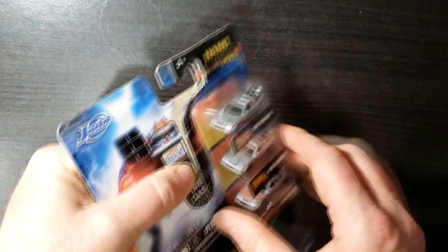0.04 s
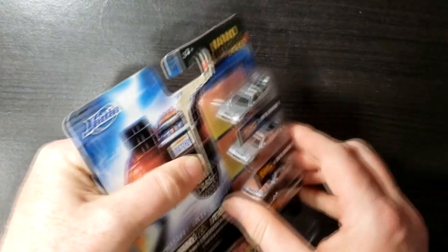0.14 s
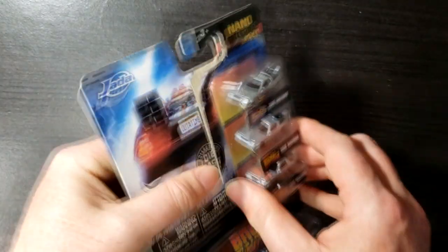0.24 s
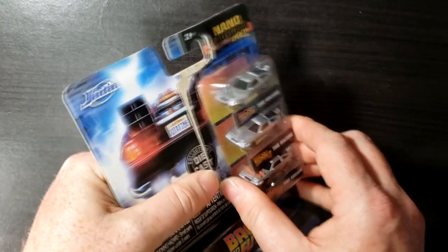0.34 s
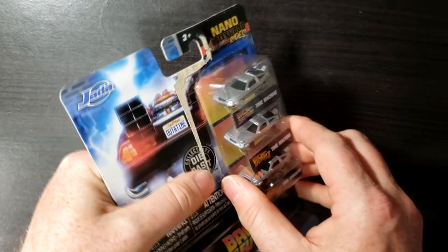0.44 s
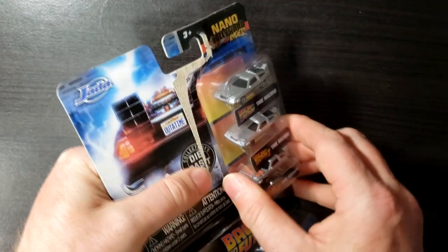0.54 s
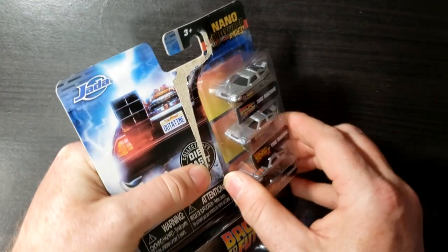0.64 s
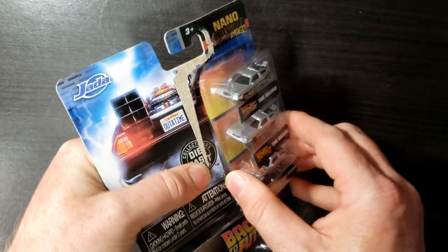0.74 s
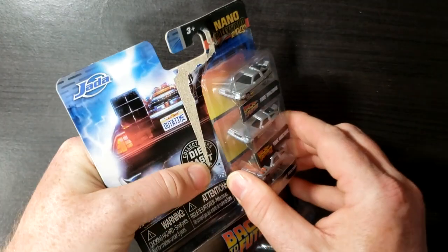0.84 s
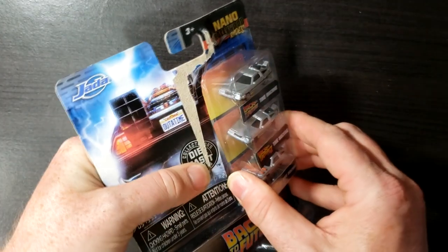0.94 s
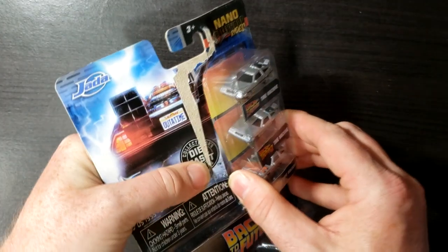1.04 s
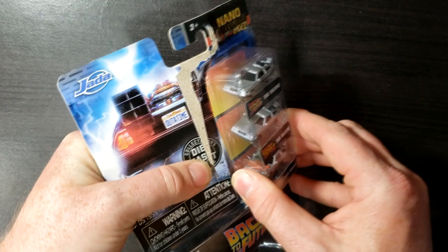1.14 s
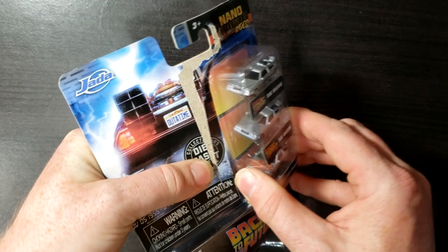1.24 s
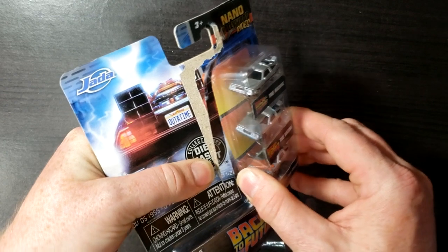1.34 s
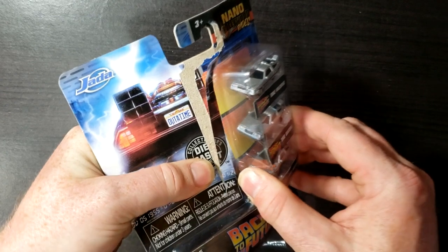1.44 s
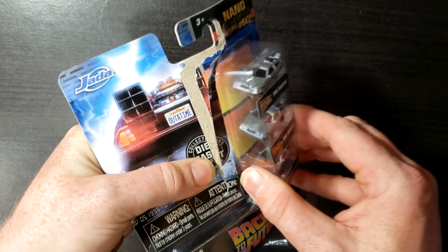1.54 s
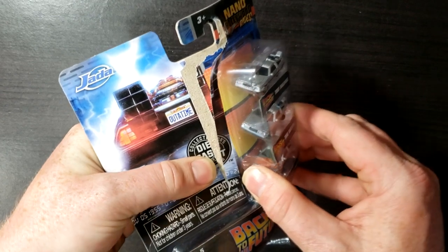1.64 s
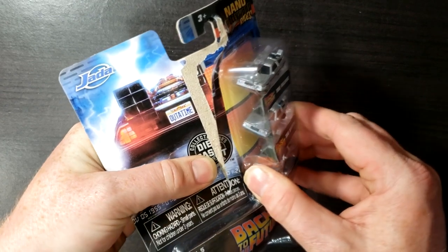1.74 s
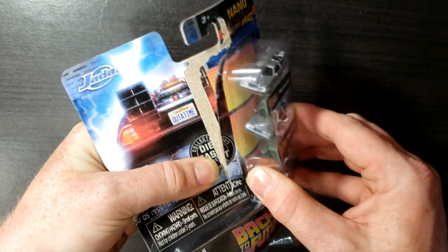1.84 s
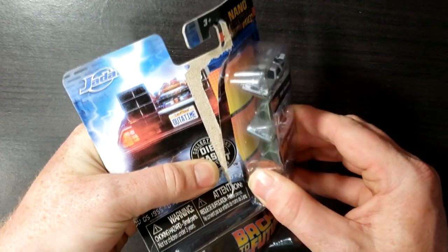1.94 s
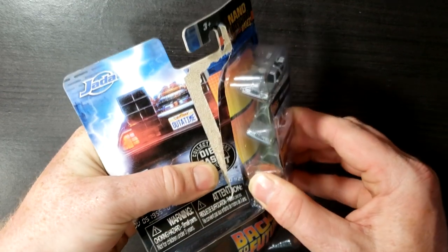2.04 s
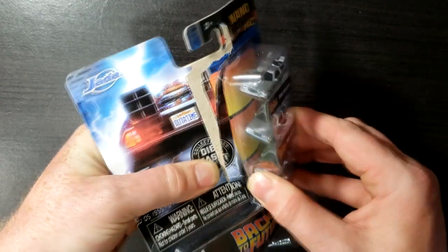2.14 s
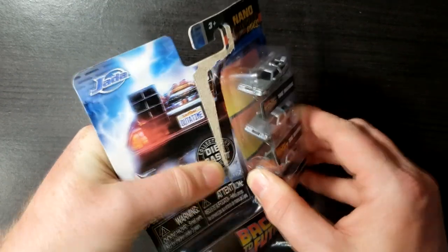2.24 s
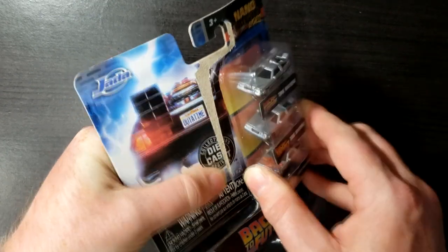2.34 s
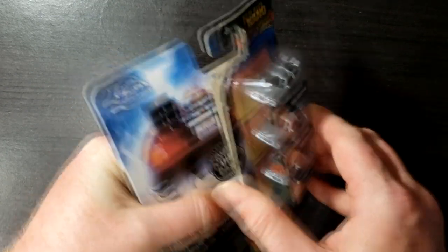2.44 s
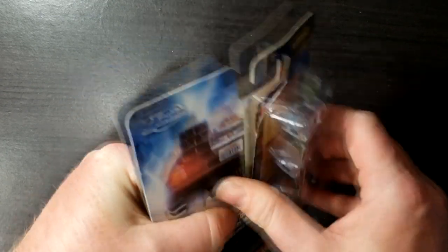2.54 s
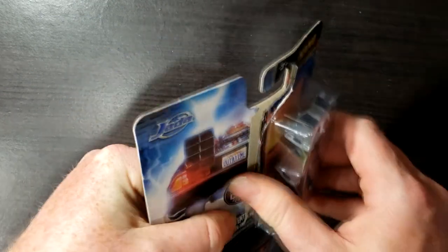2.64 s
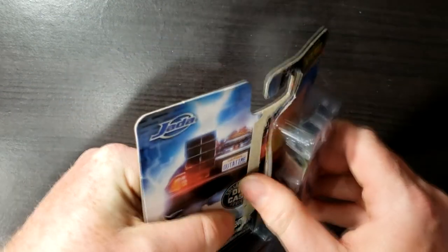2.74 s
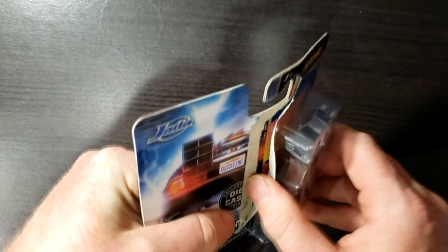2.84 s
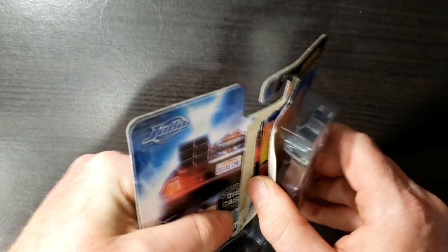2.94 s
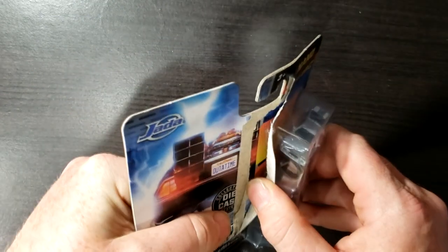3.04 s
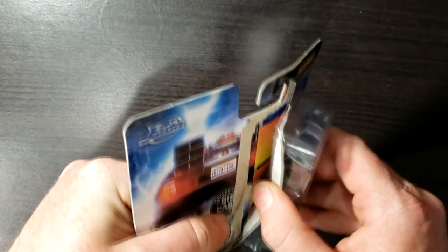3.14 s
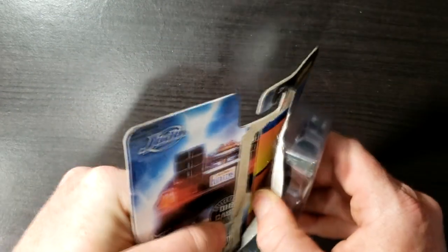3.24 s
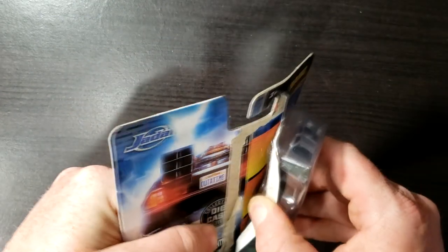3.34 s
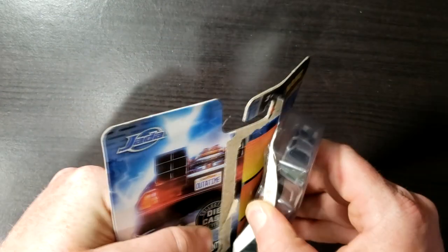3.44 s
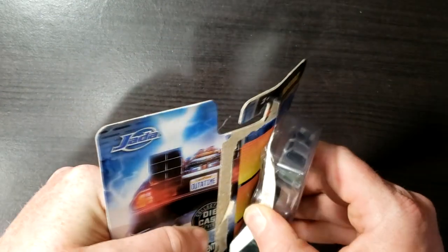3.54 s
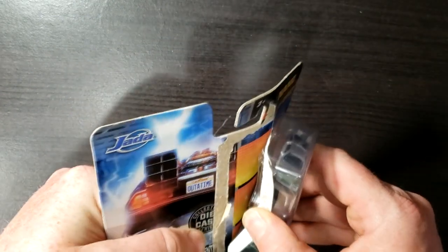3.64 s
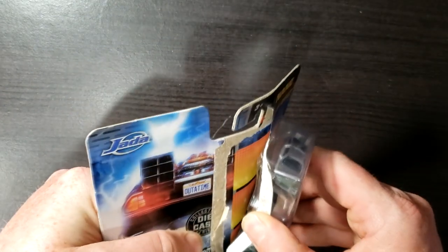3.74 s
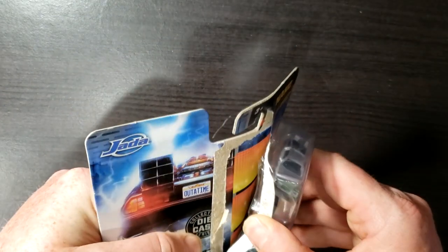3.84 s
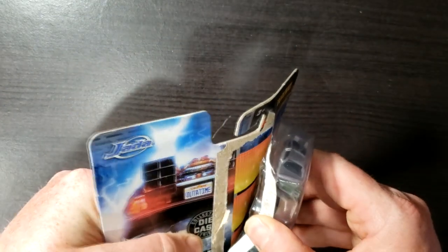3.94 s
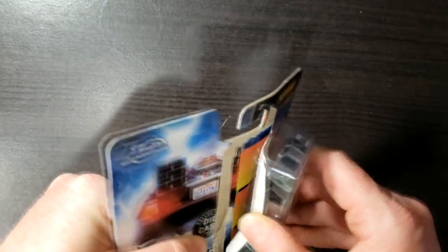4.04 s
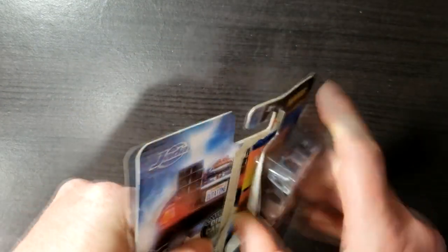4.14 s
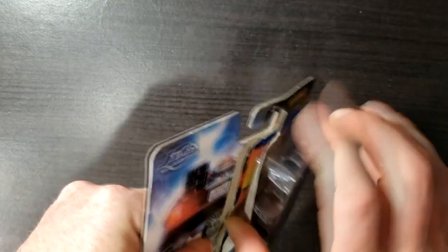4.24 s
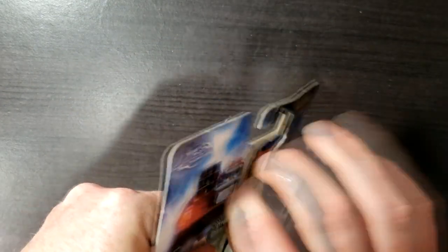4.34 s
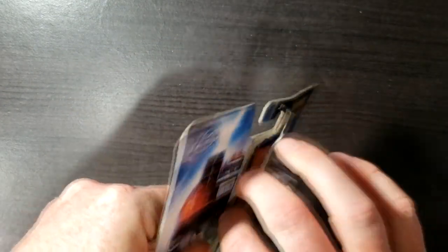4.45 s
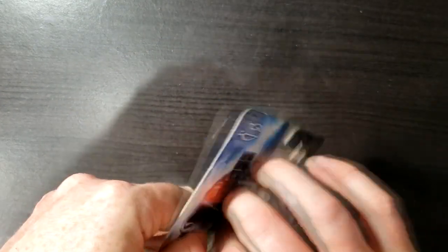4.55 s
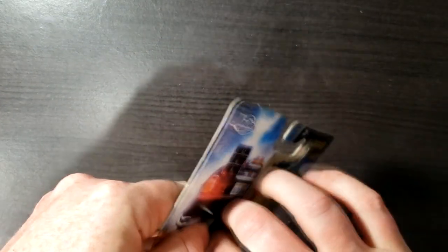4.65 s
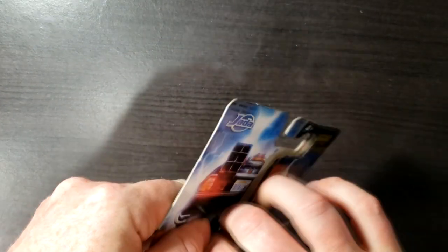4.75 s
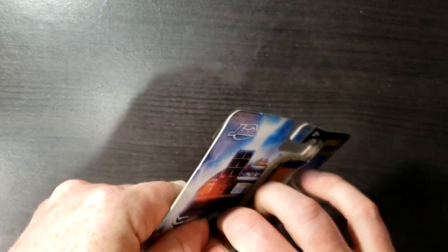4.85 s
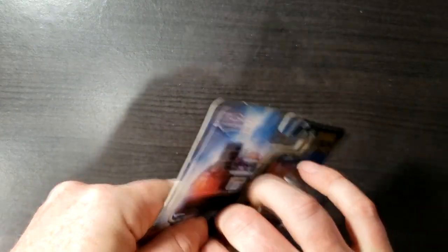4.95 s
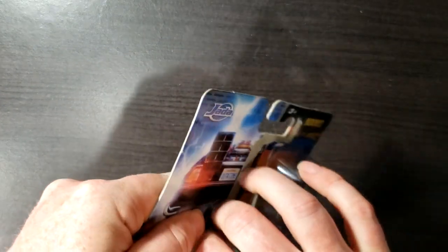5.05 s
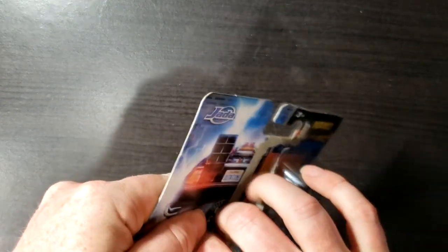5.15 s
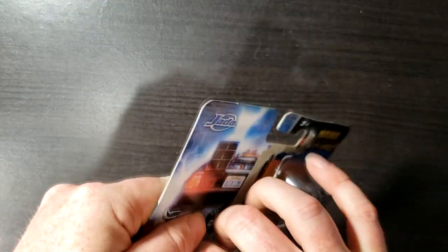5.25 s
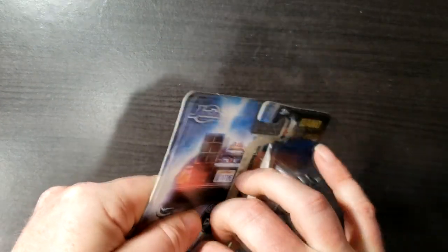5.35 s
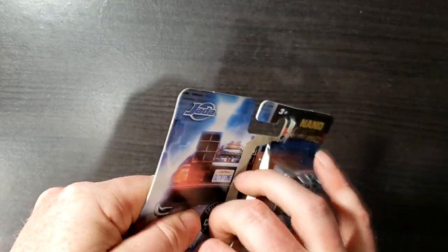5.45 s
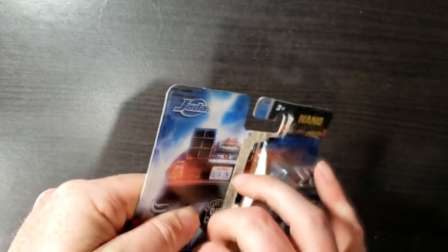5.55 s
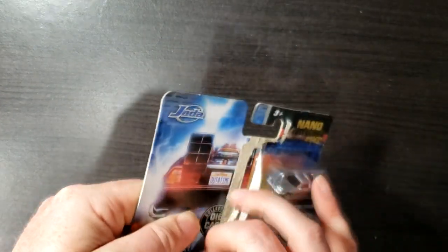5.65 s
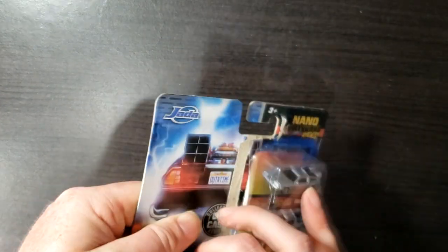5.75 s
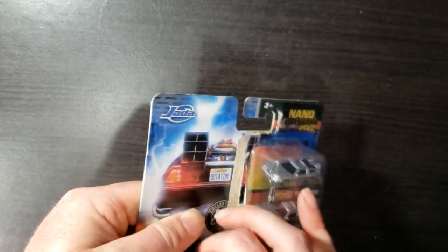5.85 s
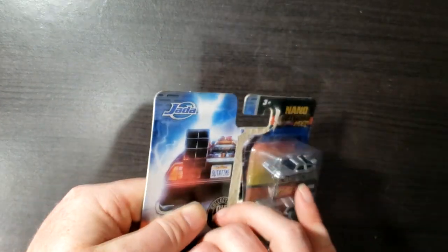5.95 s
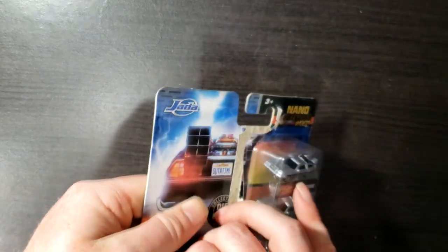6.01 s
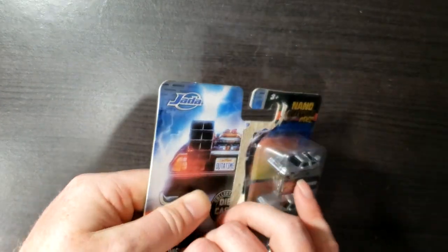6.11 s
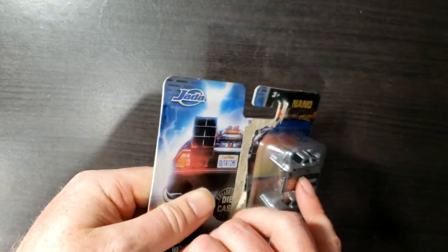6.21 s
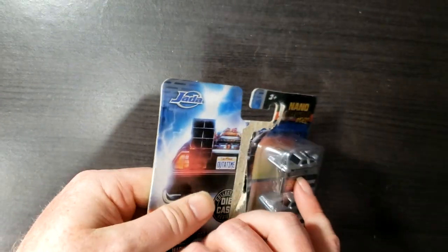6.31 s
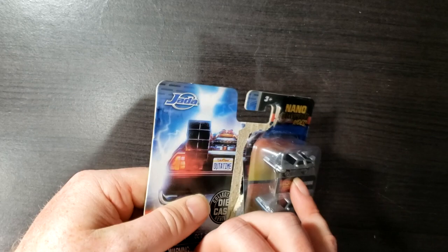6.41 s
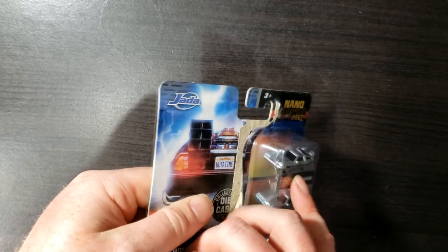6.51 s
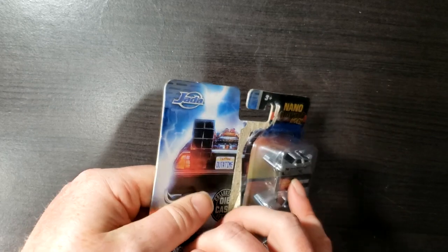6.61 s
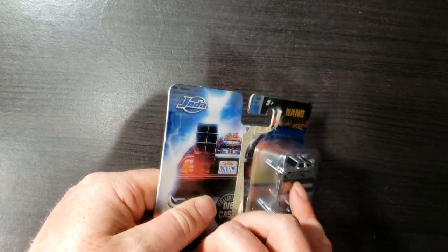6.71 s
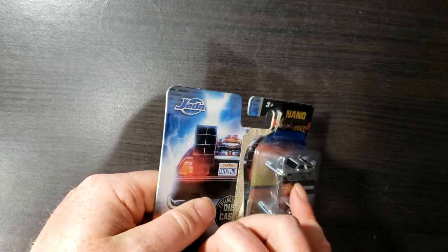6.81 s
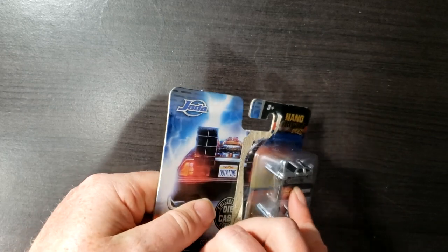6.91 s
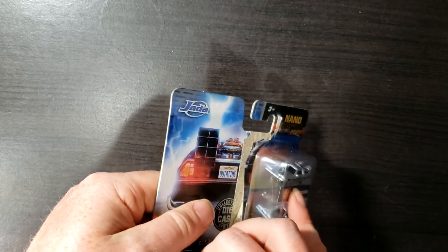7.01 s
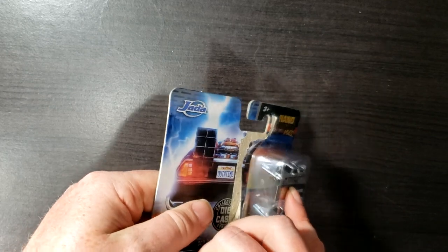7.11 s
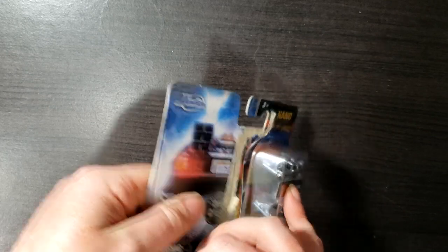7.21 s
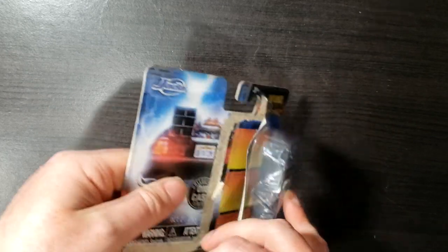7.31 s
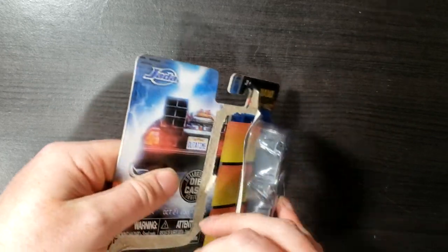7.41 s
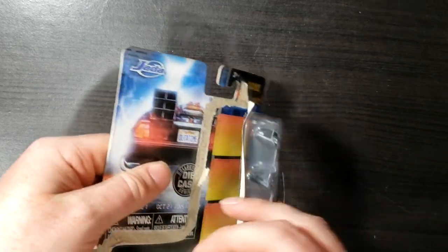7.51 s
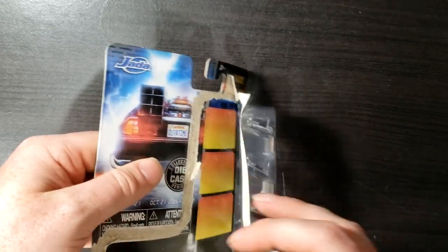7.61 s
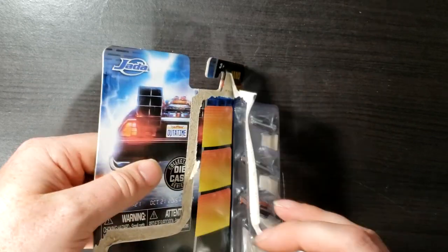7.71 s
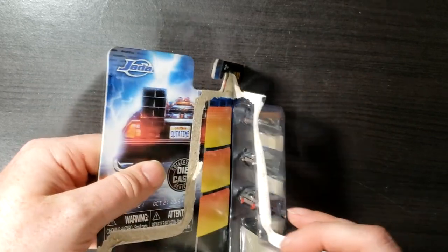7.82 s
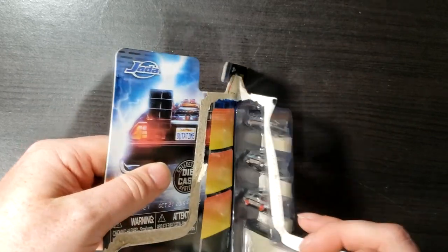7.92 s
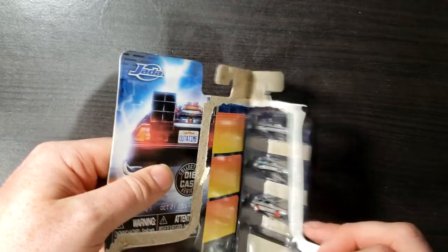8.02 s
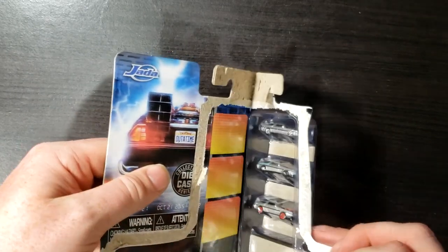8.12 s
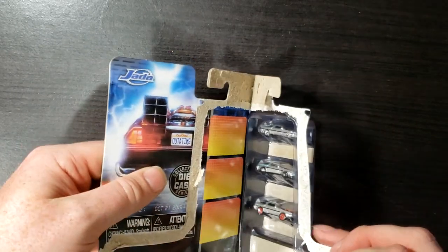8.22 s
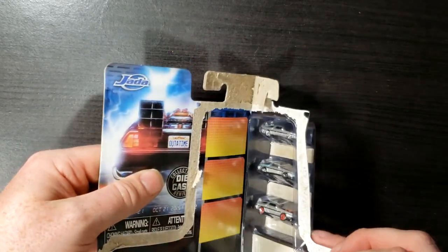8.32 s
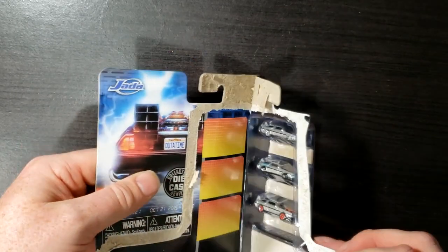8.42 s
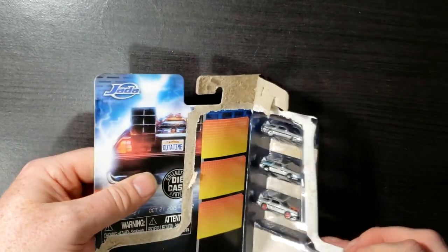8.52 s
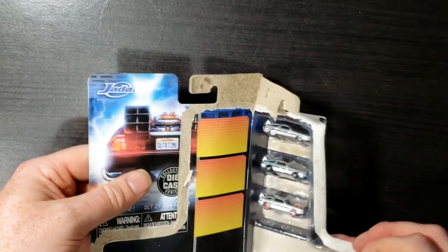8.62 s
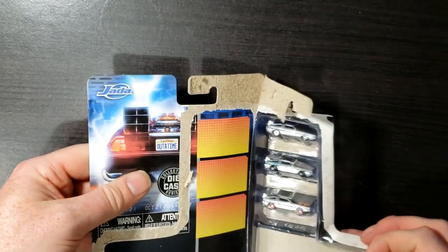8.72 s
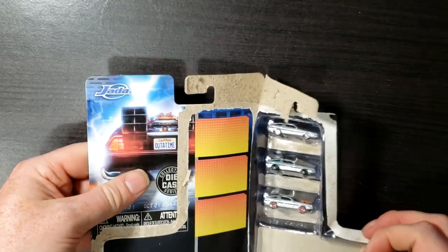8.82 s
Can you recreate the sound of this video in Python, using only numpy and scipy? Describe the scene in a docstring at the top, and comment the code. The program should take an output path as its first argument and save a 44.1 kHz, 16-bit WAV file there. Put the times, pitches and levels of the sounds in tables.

```python
"""A faint mains hum and low room air lie underneath, stronger on the right.
Close to a pair of microphones in a small room, two hands tear a plastic blister off its card backing.
Fibres crackle and plastic slides, as bursts of noise and steady noise that follow the pull of the hands.
The glue lets go in snaps: short noise cracks that ring modes of card and plastic. Dull low knocks join in.
Late in the tear, short resonant squeaks come from plastic slipping on card."""
import sys
import numpy as np
from scipy import signal
from scipy.fft import rfft, irfft, next_fast_len
from scipy.io import wavfile
from scipy.ndimage import uniform_filter1d

SR = 44100
rng = np.random.default_rng(int(sys.argv[2]) if len(sys.argv) > 2 else 0)


def put_to_file(sound):
    """Save the sound as 16-bit audio at rate SR, in the file named by the first command-line argument."""
    columns = np.atleast_2d(sound).T  # one column per channel
    safe = np.clip(columns, -1, 1)
    whole_steps = np.round(safe * 32767)
    wavfile.write(sys.argv[1], SR, whole_steps.astype(np.int16))


N = 391166

# How the plastic comes away. Each row: time in seconds, grit (0 smooth sliding, 1 separate fibres breaking).
GRITTINESS = [(0, 0.37), (.7, 0.49), (1, 0.57), (2.3, 0.89), (3, 0.86), (3.6, 0.69), (4.2, 0.93),
              (4.5, 0.26), (5, 0.79), (5.7, 0.8), (6.1, 0.5), (6.4, 1), (7, 0.35), (7.5, 0.52),
              (7.8, 0.038), (8, 0.76), (8.6, 0.39)]
CARD_HZ = 1250  # centre of the card's modes at its usual bend


def amp(db):
    """Decibels to gain."""
    return 10 ** (np.asarray(db) / 20)


def unit(x):
    """Scales to rms 1."""
    return x / np.sqrt(np.mean(x ** 2) + 1e-20)


def read(points, hz):
    """Reads a spectrum on a log-frequency axis."""
    f, value = np.transpose(points)
    return np.interp(np.log(hz + 1), np.log(f), value)


def add(mix, s, sound):
    """Adds a stereo sound at time s."""
    part = mix[:, max(round(s * SR), 0):][:, :sound.shape[1]]
    part += sound[:, :part.shape[1]]


def colour(x, spectrum, size=2048):
    """Causal minimum-phase filter with the given spectrum, so attacks stay sharp."""
    hz = abs(np.fft.fftfreq(size, 1 / SR))
    log_gain = np.log(amp(read(spectrum, hz)))
    minimum_phase = np.exp(np.conj(signal.hilbert(log_gain)))
    taps = np.fft.ifft(minimum_phase).real[:size // 2]
    return signal.fftconvolve(x, taps[None], axes=1)[:, :x.shape[1]]


def background(hum_hz=120, hum_db=(-66, -53.5), air_db=(-64.5, -60.5), apart=0.13):
    """Mains hum is one steady tone, room air is low noise; levels are for left and right."""
    # Spectrum of the air. Each row: frequency in Hz, relative level in dB per Hz.
    air_spectrum = [(15, -31.5), (33, -32.5), (41, 11.5), (62, 4), (85, 2), (130, 1.5), (200, -5),
                    (300, -4), (450, -21), (900, -16), (2000, -45.5), (5000, -42.5), (15000, -29.5)]
    hum = np.sqrt(2) * np.sin(2 * np.pi * hum_hz * np.arange(N) / SR)
    shared = rng.standard_normal(N)
    noise = shared + apart * rng.standard_normal((2, N))
    air = unit(colour(noise, air_spectrum, size=16384))
    return amp(hum_db)[:, None] * hum + amp(air_db)[:, None] * air


def pull(arch=0.58, peak_share=0.48):
    """Strength of flexing and of fizz over time: the steady strain plus tugs that swell and ease.

    arch sets how full a tug's swell is (smaller is fuller), peak_share where in its length it is strongest.
    """
    # Steady strain of the hands. Each row: time in seconds, card flexing and fibre fizz in relative dB.
    strain = [(0, -70, -80), (.49, -72.5, -71), (.78, -58.5, -50), (1.5, -48, -41.5), (2.33, -52, -44),
              (2.47, -62, -64), (2.95, -57, -54.5), (3.2, -46.5, -39), (3.96, -65, -47.5),
              (4.38, -73.5, -72), (4.5, -55.5, -50.5), (5.35, -61.5, -68), (5.7, -53, -50),
              (6.2, -63.5, -55.5), (7.2, -54, -52), (7.48, -68, -69.5), (7.659, -67, -55),
              (8.121, -66, -41.5), (8.3, -63.5, -58.5), (8.87, -59, -39)]
    # Single tugs, each peeling a little more. Each row: start in seconds, length in seconds,
    # card flexing and fibre fizz in relative dB.
    tugs = [(0.179, 0.1, -58, -60.5), (0.266, 0.17, -69, -57), (0.521, 0.18, -53, -47),
            (0.71, 0.18, -65, -42), (0.984, 0.084, -46.5, -36), (1.223, 0.12, -43, -42),
            (1.529, 0.089, -41, -34.5), (1.656, .08, -52, -35.5), (2.17, 0.14, -48, -35),
            (2.24, 0.18, -42, -53), (2.516, 0.13, -52, -57), (2.679, 0.094, -45.5, -39.5),
            (2.806, 0.069, -53, -39), (3.004, 0.13, -66, -41.5), (3.165, .13, -40.5, -38.5),
            (3.344, 0.095, -42, -38), (3.443, 0.21, -49.5, -34), (3.822, 0.095, -53, -38),
            (4.012, .1, -41.5, -37), (4.119, 0.14, -49, -47), (4.425, 0.12, -52.5, -49),
            (4.646, .1, -60, -51), (4.755, .12, -51.5, -44.5), (4.988, 0.093, -43.5, -41),
            (5.091, 0.1, -45, -40), (5.217, 0.082, -45.5, -41.5), (5.377, 0.055, -45.5, -39),
            (5.53, 0.23, -43.5, -37.5), (5.754, 0.078, -45, -33), (5.893, 0.25, -46, -38.5),
            (6.071, 0.092, -47, -35), (6.217, 0.11, -44.5, -50), (6.332, 0.075, -46, -41),
            (6.443, .1, -45.5, -50), (6.556, 0.068, -54, -45.5), (6.868, .2, -52.5, -38),
            (7.913, 0.17, -46.5, -32.5), (8.382, 0.084, -60, -45), (8.627, 0.088, -49, -36)]
    t = np.arange(N) / SR
    s, *levels = np.transpose(strain)
    power = amp([np.interp(t, s, level) for level in levels]) ** 2
    for start, length, *db in tugs:
        near = slice(round(start * SR), round((start + length) * SR))
        progress = (t[near] - start) / length
        phase = np.interp(progress, [0, peak_share, 1], [0, np.pi / 2, np.pi])
        swell = abs(np.sin(phase)) ** arch
        power[:, near] += (amp(db)[:, None] * swell) ** 2
    return np.sqrt(power)


def fibres(per_s=170, spread_db=7.0, largest=1.2, flex_decay_s=0.0027, fizz_decay_s=.001, apart_db=2.5):
    """Fibres load and break one after another, each with a short tick and a longer shiver of the card."""
    times = np.cumsum(rng.gamma(2, .5, 6000)) / per_s
    t = np.arange(SR // 80) / SR
    out = np.zeros((2, 2, N))  # shivers and ticks, each in stereo
    for s in times[times < N / SR]:
        size, length, *apart = np.clip(rng.standard_normal(4), -largest, largest)
        for layer, usual_decay, own in zip(out, (flex_decay_s, fizz_decay_s), apart):
            decay = usual_decay * np.exp(0.9 * length)
            burst = rng.standard_normal((2, len(t))) * np.exp(-t / decay)
            add(layer, s, amp(spread_db * size + apart_db * own) * burst)
    # the pull sets how much breaks in each moment, however the breaks are shared out
    local_power = uniform_filter1d((out ** 2).mean(1, keepdims=True), size=3000)
    return out / np.sqrt(local_power + 1e-4)


def tearing(flex_db=-3.5, fizz_db=-5.5, slide_db=3.0):
    """Breaking fibres and smooth sliding follow the pull, and flare where the tear runs."""
    # Fast runs of the tear. Each row: peak in seconds, rise and fall of the power in seconds,
    # flexing and fizz at the peak in dB.
    rips = [(.838, 0.0017, 0.006, -37, -35), (1.952, 0.0065, .005, -44.5, -37),
            (2.188, 0.0051, 0.017, -35, -26), (2.312, 0.0032, 0.019, -40, -33),
            (3.162, 0.0012, 0.0055, -27.5, -25), (3.51, 0.0037, 0.029, -47, -36),
            (3.67, 0.0054, 0.0039, -42.5, -31.5), (3.947, 0.0024, 0.0027, -34, -30.5),
            (4.018, 0.0015, 0.035, -36, -34.5), (5.646, 0.0016, 0.0083, -44.5, -32.5),
            (5.773, 0.0061, 0.004, -32.5, -22), (6.123, 0.0084, 0.019, -44.5, -61),
            (7.241, 0.0008, 0.0049, -40, -28.5), (7.257, 0.0044, 0.002, -36, -25),
            (7.269, 0.001, 0.0039, -28.5, -23.5), (8.07, 0.017, 0.013, -38.5, -33),
            (8.472, 0.0016, 0.022, -44, -38)]
    # Spectra of the flexing card, the fizzing fibres and plastic sliding smoothly over card.
    # Each row: frequency in Hz, relative level in dB per Hz.
    flex_spectrum = [(60, -59), (200, -10), (350, -14), (500, -9.5), (700, -7.5), (900, -4), (1130, -4.5),
                     (1380, 1), (1650, -3.5), (2100, -9), (2800, -12), (5000, -24), (12000, -56.5)]
    fizz_spectrum = [(500, -37.5), (1800, 0.5), (2600, 1.5), (3100, 0), (3800, 0), (4800, -1), (6200, 0.5),
                     (7600, 1.5), (9300, 4), (11500, 4), (13200, 3.5), (15300, 9.5), (16500, -24.5)]
    slide_spectrum = [(500, -30.5), (1800, -16.5), (2700, -33.5), (3800, -16), (4800, -11), (6200, -11),
                      (7600, -4.5), (9300, -5), (11500, -1), (13200, -1.5), (15300, 2.5), (16500, 0.5)]

    def rush(spectrum):
        """Steady coloured noise."""
        return unit(colour(rng.standard_normal((2, N)), spectrum))

    t = np.arange(N) / SR
    flex, fizz = pull()
    flex = amp(flex_db) * flex
    grit = np.interp(t, *np.transpose(GRITTINESS))
    shivers, ticks = fibres()
    shivers = unit(colour(shivers, flex_spectrum))
    ticks = unit(colour(ticks, fizz_spectrum))
    breaking = flex * shivers + amp(fizz_db) * fizz * ticks
    sliding = flex * rush(flex_spectrum) + amp(slide_db) * fizz * rush(slide_spectrum)
    out = np.sqrt(grit) * breaking + np.sqrt(1 - grit) * sliding
    low, high = rush(flex_spectrum), rush(fizz_spectrum)  # in a fast run the breaks merge
    for peak, rise, fall, low_db, high_db in rips:
        near = slice(round((peak - .1) * SR), round((peak + .2) * SR))
        flare = np.exp(-np.maximum((peak - t[near]) / rise, (t[near] - peak) / fall))
        run = amp(low_db) * low[:, near] + amp(high_db) * high[:, near]
        out[:, near] += np.sqrt(flare) * run
    return out


def small_snaps(count=260, card_over_db=1.5, crack_over_db=3, smooth_db=-8.5, scatter_db=3.5,
                usual_hz=1330, usual_ms=0.85):
    """Specks of glue give way at random, louder under a harder pull and on gritty stretches."""
    flex, fizz = 20 * np.log10(pull())
    places = rng.random(count)
    scatter = np.clip(rng.standard_normal((count, 4)), -1.5, 1.5)
    rows = []
    for place, (card, crack, pitch, length) in zip(places, scatter):
        at = int(place * N)
        s = at / SR
        soften_db = smooth_db * (1 - np.interp(s, *np.transpose(GRITTINESS)))
        card_level = flex[at] + card_over_db + soften_db + scatter_db * card
        crack_level = fizz[at] + crack_over_db + soften_db + scatter_db * crack
        rows.append((s, card_level, crack_level, usual_hz * np.exp(.13 * pitch), usual_ms * np.exp(.5 * length)))
    return rows


def ring(modes, t, stretch, scatter_db, detune):
    """Damped modes; each blow lands elsewhere and so weights and detunes them anew."""
    hz, db, t60 = np.transpose(modes)[:, :, None]
    weight, shift, side = rng.standard_normal((3, 2, len(modes), 1))
    waves = np.sin(2 * np.pi * hz * stretch * (1 + detune * shift[0]) * t)
    envelope = amp(db + scatter_db * weight - 60 * t / t60)
    return (np.sign(side) * envelope * waves).sum(1)


def blister_level(card, crack, hz, blend_db=-2.5, db_per_octave=5.5, weaker_share=0.85):
    """The blister rings most when a snap both bends and cracks, and more on a taut card."""
    weaker, stronger = sorted((card, crack))
    blend = stronger + weaker_share * (weaker - stronger)
    return blend_db + blend + db_per_octave * np.log2(hz / CARD_HZ)


def crack_spectrum(card, dull_above_hz=5500, dull_from_db=-40.5, dull_slope=0.34):
    """The more card a snap moves, the coarser its fractures and the less top its crack has.

    dull_slope is in dB per octave for each dB of card ring above dull_from_db.
    """
    # Crack of a light snap. Each row: frequency in Hz, relative level in dB per Hz.
    light_crack = [(100, -39.5), (400, -20.5), (1500, -19.5), (4500, -15), (6200, 1), (7300, 5.5),
                   (9300, 2.5), (11500, 4.5), (13200, 5.5), (15200, 6), (16500, -13)]
    slope = dull_slope * max(card - dull_from_db, 0)
    return [(hz, db - slope * max(np.log2(hz / dull_above_hz), 0)) for hz, db in light_crack]


def snaps(scatter_db=2, detune=0.036, bend=0.3, brighten_db=20, swell=0.053, rough=0.2, focus_db=9, grain=0.17):
    """A quick cluster of fractures is heard as a crack and sets the card and the blister ringing."""
    # The glue lets go. Each row: start in seconds, card ring in dB, crack in dB,
    # frequency the bent card favours in Hz, decay time of the break in ms.
    glue_breaks = [(.0439, -53.5, -73, 1250, 4.1), (.2286, -46, -53.5, 810, 0.97),
                   (.37, -46, -49, 1170, 1.6), (.3935, -46, -51, 1380, 3.1), (.5607, -25.5, -34, 1210, 2.9),
                   (.7781, -44, -33.5, 1320, 1.2), (.814, -33.5, -26, 950, 0.86),
                   (.8341, -27.5, -17.5, 1270, 2.6), (.8514, -31, -37, 1300, 2.3),
                   (.8576, -30, -27, 860, 3.2), (.8881, -31.5, -27, 1034, 1.1),
                   (.9544, -33.5, -29.5, 950, 1.8), (1.0897, -30.5, -24.5, 970, .33),
                   (1.1572, -29.5, -31, 1210, 0.54), (1.234, -31.5, -29.5, 1050, 1.9),
                   (1.3261, -28.5, -31.5, 1250, 1.6), (1.3805, -44, -37, 1172, 2.2),
                   (1.4245, -29.5, -29.5, 1120, 1.6), (1.5232, -29.5, -28, 1250, 0.48),
                   (1.5968, -31, -30, 1130, 2.9), (1.6697, -31.5, -28.5, 1170, 1.6),
                   (1.6834, -32, -36, 970, 2), (1.7282, -30.5, -31.5, 1130, .7),
                   (1.7746, -39, -43, 1590, 1.3), (1.8358, -41.5, -42, 1630, 2.1),
                   (1.9079, -37.5, -39.5, 1580, 1.01), (1.9558, -27, -23, 1310, 1.3),
                   (2.0066, -34.5, -39, 1430, 2.6), (2.023, -27, -57, 1110, 2.6),
                   (2.0583, -37.5, -36, 1330, 0.47), (2.0955, -36.5, -34.5, 1330, 5.1),
                   (2.1255, -36.5, -36, 1320, 1.2), (2.1497, -35.5, -37.5, 1230, .74),
                   (2.183, -25.5, -20, 1360, 0.42), (2.227, -32, -43, 1620, 1.1),
                   (2.238, -31, -34, 1330, 1.6), (2.2614, -36, -40, 1620, 1.3),
                   (2.2744, -35, -44, 1550, 1.95), (2.287, -40, -41, 1440, 5.5),
                   (2.304, -39.5, -19, 1100, 0.48), (2.4056, -38, -47, 1210, 0.67),
                   (2.4667, -42.5, -53, 1240, 4.6), (2.5226, -49, -44.5, 1320, 1.9),
                   (2.7502, -33.5, -44, 1070, 0.27), (2.8063, -43.5, -42, 1380, 0.83),
                   (2.9857, -48, -42, 1160, 0.47), (3.0348, -43.5, -33, 1520, 1.1),
                   (3.0939, -42.5, -35, 1450, 1.3), (3.1288, -38.5, -44, 1330, 3.3),
                   (3.1646, -22.5, -21.5, 1050, 2.7), (3.3463, -40.5, -34, 1100, 3.9),
                   (3.3643, -38, -41, 1320, 1.7), (3.505, -37.5, -33, 1110, 1.3),
                   (3.5655, -34.5, -35, 1370, 3.4), (3.6669, -35, -39, 1190, 2.8),
                   (3.7388, -43, -37.5, 1200, 1.8), (3.7855, -35.5, -33.5, 1330, 3.9),
                   (3.8126, -36, -34.5, 1360, 0.41), (3.8778, -35.5, -41, 1330, 1.7),
                   (3.93, -39, -42, 1366, 1.6), (3.9449, -36, -31.5, 1360, 1.8),
                   (4.0138, -14.5, -16.5, 1050, 2.8), (4.0877, -46, -38, 1210, .54),
                   (4.1653, -50, -36.5, 1330, 1.56), (4.605, -44, -54, 906, 3.7),
                   (4.6548, -50, -46, 1290, 1.5), (4.8133, -45.5, -57, 1140, 2.9),
                   (4.899, -48, -46, 1190, 1.4), (4.9269, -42.5, -47.5, 1320, 3.6),
                   (4.9984, -49, -34, 1250, 2), (5.034, -32, -53, 1450, 3.1), (5.0988, -64, -38, 1240, 0.4),
                   (5.197, -46, -42, 1340, 0.78), (5.2725, -34.5, -38.5, 1080, 2.8),
                   (5.369, -53, -40, 1110, 1.6), (5.4454, -32, -40, 1130, 2), (5.4684, -46, -35, 1230, 1.6),
                   (5.499, -42, -35, 1300, .54), (5.5434, -41.5, -33.5, 1133, 3.8),
                   (5.642, -41, -28, 1370, 1.1), (5.6872, -28, -56, 1220, 7.3),
                   (5.7636, -31.5, -18.5, 1480, 0.25), (5.8694, -44.5, -41, 1543, 2.3),
                   (5.9122, -38.5, -48, 1340, 1.6), (6.121, -37, -25, 1240, 5.1),
                   (6.3958, -40.5, -37, 1320, 2.7), (6.4312, -41.5, -39, 1480, 0.83),
                   (6.453, -40, -38, 1420, 2.8), (6.4661, -32.5, -65, 1050, 1.1),
                   (6.492, -41.5, -37, 1300, 1.3), (6.5875, -45, -45, 1850, 4), (6.781, -29, -24, 1680, .5),
                   (6.8357, -49, -42, 1450, 1.7), (7.3693, -49.5, -46.5, 1390, 1.2),
                   (7.9372, -32.5, -43.5, 1197, 5.3), (8.0706, -29, -32, 930, 4),
                   (8.184, -59, -42, 1200, 0.23), (8.2295, -50.5, -37.5, 1030, 0.25),
                   (8.2988, -57.5, -40, 960, 0.52), (8.6278, -36, -65, 1200, 7.4),
                   (8.769, -44, -36, 1730, 4.1), (8.8317, -42, -36, 1420, 6.3)]
    # Modes of the card at its usual bend. Each row: frequency in Hz, relative level in dB, t60 in seconds.
    card_modes = [(570, -15, 0.039), (700, 3, 0.014), (820, 1.5, 0.016), (960, 0, 0.025), (1130, -1, 0.013),
                  (1320, 0, 0.029), (1450, -3.5, 0.039), (1620, 4.5, 0.015), (1868, 2, 0.015),
                  (2290, -5.5, 0.025)]
    # Modes of the blister, rung 2 % lower. Each row: frequency in Hz, relative level in dB, t60 in seconds.
    blister_modes = [(2190, 3.5, .005), (2460, 3, 0.003), (2780, -6, 0.0087), (3555, -1, .007),
                     (3850, 5, 0.01), (4340, 10, 0.0018), (5200, 4, 0.0058), (5900, 1.5, 0.0061)]
    out, t = np.zeros((2, N)), np.arange(SR // 25) / SR
    head = round(.006 * SR)
    # the small pack sends out little below 590 Hz
    radiate = signal.butter(4, 590, "high", fs=SR, output="sos")

    def at_level(x, db):
        """Sets the level over the first 6 ms of a snap."""
        return amp(db) * x / np.sqrt(np.mean(x[:, :head] ** 2, axis=1, keepdims=True))

    def drive(body, force):
        """Lets a force set a ringing body off."""
        return signal.fftconvolve(body, force, axes=1)[:, :len(t)]

    for s, card, crack, hz, ms in list(glue_breaks) + small_snaps():
        age = 1000 * t / ms
        fractures = rng.standard_normal((2, len(t))) * np.exp(-age) * (1 - np.exp(-age / swell))
        # the load drops all at once
        release = (t == 0) + rough * fractures[:1] * np.exp(-t / 0.0014)
        tension = hz / CARD_HZ  # a tauter card rings higher and favours its upper modes
        modes = []
        for f, db, t60 in card_modes:
            brighten = brighten_db * np.log(tension) * np.log(f / CARD_HZ)
            focus = focus_db * np.log(f / hz) ** 2
            modes.append((f, db + brighten - focus, t60))
        flex = drive(ring(modes, t, tension ** bend, scatter_db, detune), release)
        shell = drive(ring(blister_modes, t, 0.98, scatter_db, 2 * detune), (t == 0) + grain * fractures)
        add(out, s, at_level(signal.sosfilt(radiate, flex), card))
        add(out, s, at_level(signal.sosfilt(radiate, shell), blister_level(card, crack, hz)))
        add(out, s, at_level(colour(fractures, crack_spectrum(card)), crack))
    return out


def knocks(rustle=0.95):
    """The whole pack bumps against the fingers: a low, quickly damped swing with a rub of noise."""
    # Dull knocks. Each row: start in seconds, level in dB, frequency in Hz, decay time in seconds.
    bumps = [(0.233, -50.5, 193, 0.0058), (0.859, -38, 427, 0.0055), (.891, -40, 440, 0.0032),
             (.956, -38.5, 450, 0.0026), (1.091, -43, 433, 0.0056), (1.235, -42.5, 467, 0.011),
             (1.682, -45, 475, 0.0059), (3.167, -36, 237, 0.0047), (5.768, -61, 336, 0.011),
             (6.12, -55, 300, 0.014), (7.147, -48.5, 328, 0.0043), (7.241, -25.5, 422, 0.0025),
             (7.254, -42, 190, 0.013), (7.269, -31, 430, 0.0028), (7.27, -45, 160, 0.0093),
             (8.066, -43, 350, 0.012), (8.073, -41.5, 120, 0.018)]
    out, t = np.zeros((2, N)), np.arange(SR // 6) / SR
    for s, db, hz, decay in bumps:
        around = [(hz / 4, -16), (hz, 0), (hz * 2, -7), (hz * 6, -35)]  # Hz, dB
        rub = unit(colour(rng.standard_normal((2, len(t))), around))
        swing = np.sin(2 * np.pi * hz * t)
        add(out, s, amp(db) * (swing + rustle * rub) * np.exp(-t / decay))
    return out


def squeaks():
    """Plastic sliding on card: rapid uneven slips feed one resonance of the pack."""
    # Each row: start in seconds, length in seconds, resonance in Hz, its width in Hz, level in dB before fades.
    slides = [(6.656, 0.15, 1550, 130, -50.5), (7.051, 0.034, 2660, 1520, -47),
              (7.676, 0.029, 870, 198, -54), (7.797, 0.026, 1410, 500, -62.5),
              (7.972, 0.067, 4100, 700, -37.5), (8.67, 0.038, 2770, 1440, -46.5)]
    out = np.zeros((2, N))
    for s, length, hz, width, db in slides:
        slips = rng.standard_normal((2, round(length * SR)))
        tone = signal.lfilter(*signal.iirpeak(hz, hz / width, fs=SR), slips)
        fades = signal.windows.tukey(tone.shape[1], .5)
        add(out, s, amp(db) * unit(tone) * fades)
    return out


def microphones(pair, lag_s=.00006):
    """Two unrelated versions of a sound become left and right; the left microphone is nearer."""
    # Right microphone against the left. Each row: frequency in Hz, level difference in dB.
    right_level = [(100, 1.5), (380, -1), (700, -4), (1300, -6.5), (2400, -9.5), (4400, -6.5), (8000, -10),
                   (11500, -2), (15000, -14.5)]
    # How alike the two are. Each row: frequency in Hz, likeness from 0 to 1.
    likeness = [(100, 0.45), (700, 0.93), (1500, 0.57), (3000, 0.37), (7000, 0.33), (15000, 0.1)]
    size = next_fast_len(N + SR // 10)
    hz = np.fft.rfftfreq(size, 1 / SR)
    left, other = rfft(pair, size)
    alike = read(likeness, hz)
    right = alike * left + np.sqrt(1 - alike ** 2) * other
    delay = np.exp(-2j * np.pi * hz * lag_s)
    right = right * amp(read(right_level, hz)) * delay
    return irfft(np.array([left, right]), size)[:, :N]


def echoes(desk_db=-13, wall_db=-13, tail_db=-12, desk_decay_s=.005, wall_s=0.0064, wall_spread_s=0.0049):
    """Scatter from hands and desk, a near wall, then a short diffuse tail."""
    # Decay of the room. Each row: frequency in Hz, t60 in seconds.
    room_decay = [(200, 0.23), (600, 0.22), (1400, 0.16), (3700, 0.23), (9700, 0.1), (16000, 0.11)]
    t = np.arange(SR // 3) / SR
    shape = (3, 2, len(t))
    desk, wall, tail = rng.standard_normal(shape) * (rng.random(shape) < .2)  # sparse reflections
    desk = desk * (t > .0012) * np.exp(-t / desk_decay_s)
    wall = wall * np.exp(-((t - wall_s) / wall_spread_s) ** 2 / 2)
    tail = tail * np.clip((t - .007) / 0.0011, 0, 1)
    # each frequency of the tail dies at its own pace
    hz, when, z = signal.stft(tail, SR, nperseg=256)
    dying = amp(-60 * when / read(room_decay, hz)[:, None])
    tail = signal.istft(z * dying, SR, nperseg=256)[1][:, :len(t)]
    total = amp(desk_db) * unit(desk) + amp(wall_db) * unit(wall) + amp(tail_db) * unit(tail)
    return total / np.sqrt(len(t))


def room(x, count=7, turn_s=.09):
    """The pack keeps turning in the hands, so its sound cycles through several echo patterns."""
    place, out = np.arange(N) / (SR * turn_s), x.copy()
    for k in range(count):
        # crossfades from one pattern to the next
        share = np.sqrt(np.maximum(1 - abs((place - k) % count - 1), 0))
        out += signal.oaconvolve(x * share, echoes(), axes=1)[:, :N]
    return out


def scene():
    """The pack in its room, over hum and air."""
    pack = tearing() + snaps() + knocks() + squeaks()
    return background() + room(microphones(pack))


def record(dry):
    """Clips at full scale, then cuts the band above 15950 Hz."""
    low_pass = signal.firwin(301, 15950, window=("kaiser", 8), fs=SR)
    return signal.oaconvolve(np.clip(dry, -1, 1), low_pass[None], "same", axes=1)


dry = scene()
out = record(dry)
put_to_file(out)
```